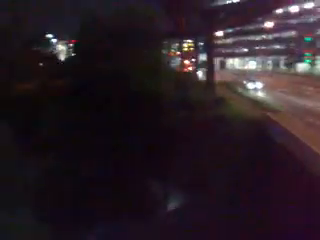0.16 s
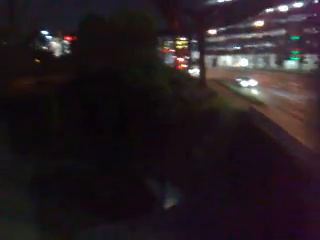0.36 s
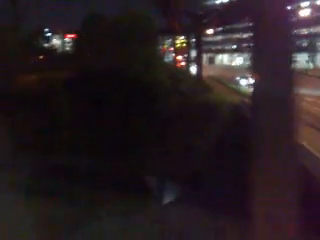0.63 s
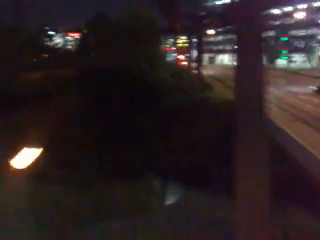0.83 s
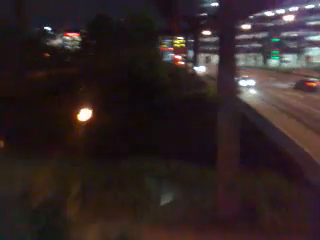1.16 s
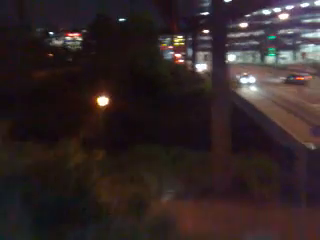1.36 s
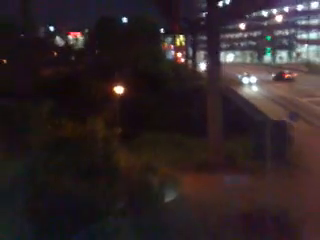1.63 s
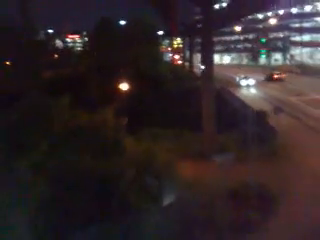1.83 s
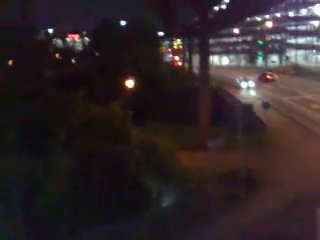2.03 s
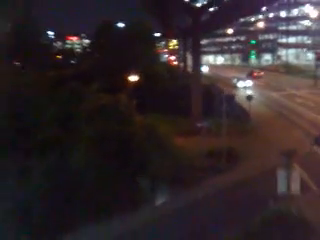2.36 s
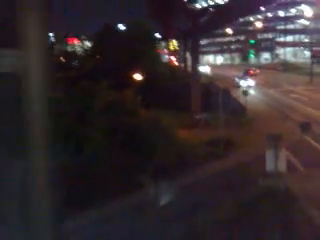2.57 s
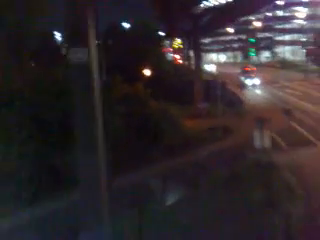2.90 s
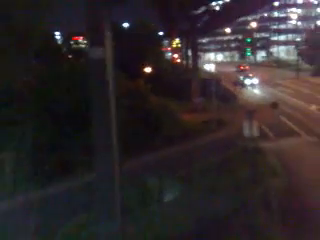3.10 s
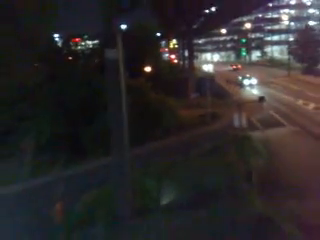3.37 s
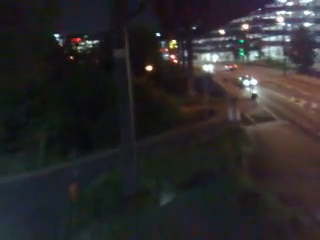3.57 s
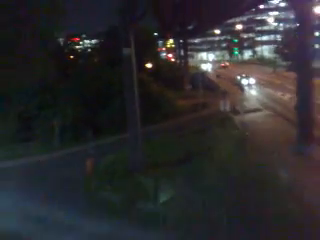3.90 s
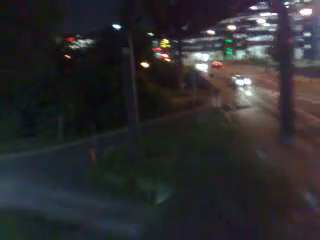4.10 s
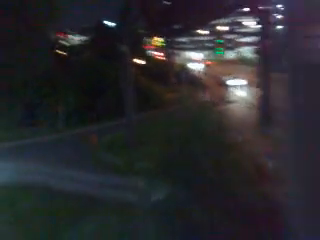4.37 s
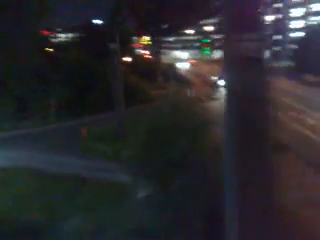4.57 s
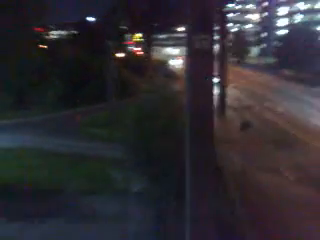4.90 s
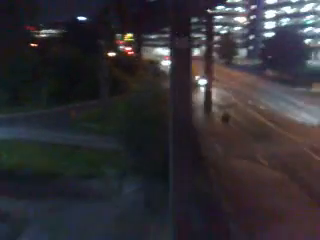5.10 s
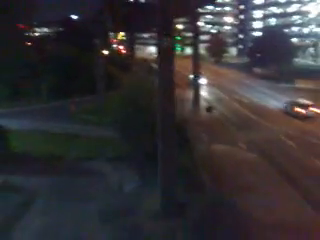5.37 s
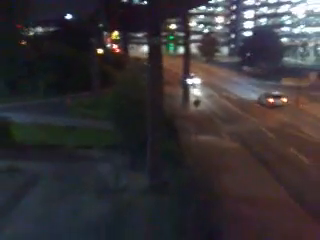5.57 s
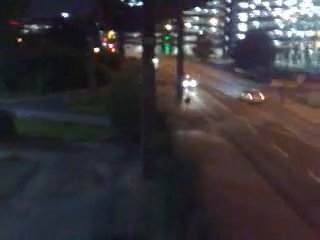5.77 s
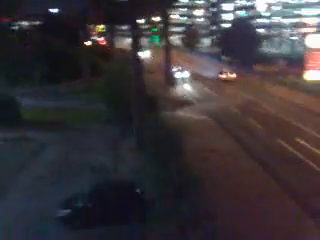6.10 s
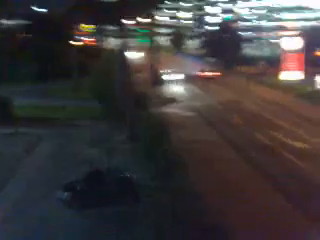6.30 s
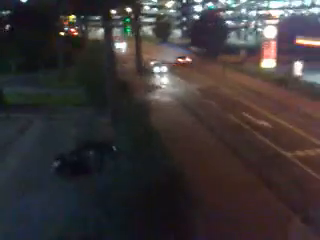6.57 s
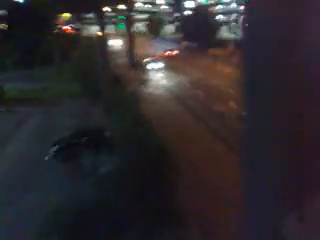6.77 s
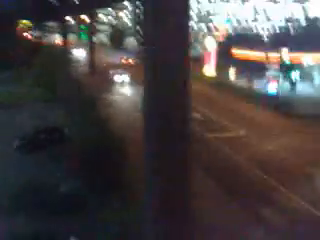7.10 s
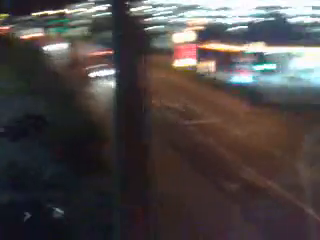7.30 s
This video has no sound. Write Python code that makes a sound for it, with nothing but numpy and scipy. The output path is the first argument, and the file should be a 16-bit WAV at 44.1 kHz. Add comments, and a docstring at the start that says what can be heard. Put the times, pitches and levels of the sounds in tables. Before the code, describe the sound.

A suspended monorail car rumbles and hums along its track, heard from inside, with bumps, brief rattles and a thin electric buzz later on.

```python
"""Suspended monorail cabin at night.

Rubber tyres roll on the beam overhead and shake the frame and panels; bumps knock, fittings rattle.
Two fans beat slowly against each other. The rectified mains hum throughout, and from about 5 s
the coils of the drive electronics add a thin, high buzz."""
import sys
import numpy as np
from scipy import signal
from scipy.fft import rfft, irfft
from scipy.io import wavfile
from scipy.ndimage import uniform_filter1d

SR = 44100
rng = np.random.default_rng(int(sys.argv[2]) if len(sys.argv) > 2 else 0)


def waveform_to_disk(signal):
    """Save audio, clipped to [-1, 1], as 16-bit WAV at the path in sys.argv[1]."""
    frames = np.transpose(np.atleast_2d(signal))
    scaled = np.clip(frames, -1, 1) * 32767
    samples = np.round(scaled).astype(np.int16)
    wavfile.write(sys.argv[1], SR, samples)


N = 328545
TIME = np.arange(N) / SR
MAINS_HZ = 50.05
DRIVE_ON_S = 4.9

# tyre noise on the beam: time_s, roar_db, hiss_db
TYRE_LEVELS = [(0, -41, -45.5), (.6, -40.5, -43.5), (1.35, -41, -47), (2.4, -38.5, -46.5),
               (3.2, -41, -47.5), (3.4, -42, -50), (5.0, -42.5, -50.5), (6.4, -44, -51.5), (7.0, -41, -50),
               (7.45, -46, -50)]
# cabin panel resonances: pitch_hz, width_hz, gain_db
PANEL_MODES = [(136.2, 22.4, -3), (183.2, 38.5, -3.5), (224.7, 12.9, -2), (257, 48, -11.5),
               (320.7, 47, -11.5), (373, 31, -16.5), (430.6, 53, -18.5)]


def undb(db):
    """Decibels to gain."""
    return 10 ** (np.asarray(db) / 20)


def unit(x):
    """Scale to rms 1."""
    return x / np.sqrt(np.mean(x ** 2))


def curves(table):
    """Per-sample curve for each column after time_s."""
    time_s, *columns = np.transpose(table)
    return [np.interp(TIME, time_s, column) for column in columns]


def gate(start_s, end_s, edge_s):
    """Linear rise, hold, linear fall."""
    return np.clip(np.minimum(TIME - start_s, end_s - TIME) / edge_s + .5, 0, 1)


def swell(peak_s, half_s):
    """Gaussian envelope, 1/e at half_s from the peak."""
    return np.exp(-((TIME - peak_s) / half_s) ** 2)


def walk(rate_hz):
    """Smooth random drift, spread near 1."""
    step = int(SR / rate_hz)
    held = np.repeat(rng.standard_normal(N // step + 1), step)
    return 1.22 * uniform_filter1d(uniform_filter1d(held, step), step)[:N]


def colour(spectrum, hz):
    """Gain of a (freq_hz, gain_db) spectrum at hz; steep fall past its ends."""
    freq_hz, gain_db = np.transpose(spectrum)
    inside = undb(np.interp(np.log(hz + 1), np.log(freq_hz), gain_db))
    return inside * np.minimum(hz / freq_hz[0], 1) ** 4 / np.maximum(hz / freq_hz[-1], 1) ** 4


def noise(spectrum):
    """Coloured noise, rms 1."""
    hz = np.arange(N // 2 + 1) * SR / N
    return unit(irfft(rfft(rng.standard_normal(N)) * colour(spectrum, hz), N))


def ring(force, modes):
    """Force through parallel resonances; neighbours swing in opposite senses."""
    out = 0
    for k, (hz, width_hz, db) in enumerate(modes):
        resonator = signal.iirpeak(hz, hz / width_hz, SR)
        out = out + (-1) ** k * undb(db) * signal.lfilter(*resonator, force)
    return out


def whistles():
    """Faint equipment whistles, slightly unsteady in pitch and level."""
    # start_s, end_s, pitch_hz, level_db
    tones = [(0, 4.2, 2308, -65), (0, 1.1, 3020, -63), (2.38, 4.0, 4096, -63.5)]
    out = 0
    for start_s, end_s, hz, db in tones:
        turns = np.cumsum(hz + 4 * walk(120)) / SR
        envelope = undb(db + 1.5 * walk(12)) * gate(start_s, end_s, edge_s=0.056)
        out = out + np.sqrt(2) * np.sin(2 * np.pi * turns) * envelope
    return out


def fans():
    """Two nearly matched fans blow air; their blade tones beat about twice a second."""
    # gap between the blade tones: time_s, beat_hz
    beats = [(0, 2.04), (2.5, 2.0), (4.3, 1.9), (5.0, 1.55), (6, 1.75), (6.6, 2.0), (7.45, 1.85)]
    # air rush: freq_hz, gain_db
    rush_spectrum = [(240, 3), (330, 2), (385, 4), (415, -1), (445, 2), (500, -8), (560, -6), (610, -4),
                     (740, -4), (850, -14), (1100, -12.5), (1350, -17.5)]
    blade_hz, blade_db, rush_db = 359.4, -39, -39
    beat_hz, = curves(beats)
    turns = np.cumsum(blade_hz + 0.36 * walk(2.59)) / SR
    lag = np.cumsum(beat_hz) / SR / 2
    pair = np.sin(2 * np.pi * (turns - lag)) - 0.74 * np.sin(2 * np.pi * (turns + lag))
    blades = unit(pair) * undb(blade_db + 0.76 * walk(7.0))
    return blades + noise(rush_spectrum) * undb(rush_db + .5 * walk(5))


def rectifier():
    """Six-pulse supply ripple at 6 and 12 times the mains; sinks while coasting, returns under load."""
    # time_s, sixth_db, twelfth_db
    ripple_levels = [(0, -37, -40.5), (.8, -35.5, -42.5), (1.15, -40, -43.5), (1.4, -41, -45.5),
                     (2.7, -39.5, -44.5), (3.5, -40, -48.5), (4.2, -43, -53), (4.7, -42.5, -54),
                     (4.8, -36.5, -41), (6.0, -34, -43.5), (7.45, -33, -41.5)]
    out = 0
    for order, db in zip((6, 12), curves(ripple_levels)):
        turns = order * MAINS_HZ * TIME + rng.random()
        out = out + np.sqrt(2) * np.sin(2 * np.pi * turns) * undb(db + 0.5 * walk(9))
    return out


def mains_lines(orders, gains, flicker_db, start_s):
    """Mains harmonics, out of step after crossing the cabin; each flickers and wanders on its own."""
    on = TIME >= start_s
    t = TIME[on]
    flicker = np.tile(undb(flicker_db * walk(18)), 2)
    wander_turns = np.tile(.11 * walk(45), 2)
    lines = 0
    for order, gain in zip(orders, gains):
        waver = flicker[rng.integers(N):][:len(t)]
        turns = MAINS_HZ * order * t + rng.random() + wander_turns[rng.integers(N):][:len(t)]
        lines = lines + gain * waver * np.sin(2 * np.pi * (turns % 1), dtype=np.float32)
    out = np.zeros(N)
    out[on] = unit(lines)
    return out


def drive_gain():
    """The drive switches on, comes up smoothly, then grows slowly."""
    base_db, rise_s, growth_db_per_s = -51, 0.46, 3
    since_s = np.maximum(TIME - DRIVE_ON_S, 0)
    return (1 - np.exp(-(since_s / rise_s) ** 2)) * undb(base_db + growth_db_per_s * since_s)


def coil_buzz():
    """Switching on each mains half-wave makes the coils sizzle."""
    # harmonics the casing favours: pitch_hz, gain_db
    casing_peaks = [(2805, -60.5), (2002, -61), (2703, -61), (4307, -66), (4506, -66), (4807, -65.5),
                    (4904, -66), (5103, -67), (5206, -65), (5308, -70), (5405, -68), (5507, -73),
                    (5604, -68), (5706, -69), (5809, -62.5), (5905, -66.5), (6008, -65.5), (6105, -64.5),
                    (6207, -66.5), (6309, -63.5)]
    # weaker lines and noise: freq_hz, gain_db
    spectrum = [(1500, 16.5), (2000, -3), (2400, 0), (2750, -3), (3100, -0.5), (3400, -6), (3750, -3.5),
                (4000, -2), (4600, -1.5), (5200, -14), (5550, -2.5), (5830, -6), (6200, -7.5), (6550, 3),
                (6900, -3.5), (7300, -8)]
    favoured = {round(hz / MAINS_HZ): undb(db) for hz, db in casing_peaks}
    orders = np.arange(36, 147)
    # weaker lines between the 100 Hz harmonics roughen the buzz
    gains = [favoured.get(k, colour(spectrum, MAINS_HZ * k) * undb(-67 - 6 * (k % 2))) for k in orders]
    lines = mains_lines(orders, gains, flicker_db=3, start_s=DRIVE_ON_S)
    sizzle = (lines + undb(-5) * noise(spectrum)) * undb(1.3 * walk(110))
    return sizzle * drive_gain()


def coil_whine():
    """The casing rings with the harmonics near its resonance; the whine follows the drive and surges."""
    # start_s, length_s, level_db
    surges = [(.68, 0.55, -66.5), (6.353, 0.26, -45), (7.02, 0.088, -46), (7.235, 0.078, -46),
              (7.414, .1, -41.5)]
    # casing resonance: freq_hz, gain_db
    spectrum = [(6300, -1), (6450, -17), (6600, 1.5), (6720, -6), (6850, -17), (7100, -42.5)]
    surge_gain = sum(undb(db) * gate(s, s + length_s, edge_s=0.038) for s, length_s, db in surges)
    orders = np.arange(126, 138)
    gains = colour(spectrum, MAINS_HZ * orders) * undb(-8 * (orders % 2))
    lines = mains_lines(orders, gains, flicker_db=3, start_s=0)
    hiss = unit(ring(noise(spectrum), [(6620, 250, 0)]))
    return unit(lines + undb(-3) * hiss) * np.hypot(drive_gain() * undb(-7.5), surge_gain)


def collectors():
    """Shoes slide on the power rails; their grainy hiss swells with the tyre hiss."""
    # sliding noise: freq_hz, gain_db
    spectrum = [(3400, -10), (3750, 1), (4100, 5.5), (4600, 1.5), (5000, -3), (5600, -8), (6050, -7),
                (6700, -11.5), (7100, -28)]
    mean_db, follow_db_per_db = -60.5, 0.24
    _, hiss_db = curves(TYRE_LEVELS)
    level_db = mean_db + follow_db_per_db * (hiss_db - hiss_db.mean())
    return noise(spectrum) * undb(level_db + 1.7 * walk(60))


def squeaks():
    """Suspension joints rub briefly at an unsteady pitch."""
    # peak_s, half_s, pitch_hz, level_db
    rubs = [(0.577, 0.014, 4000, -58), (0.68, .025, 4130, -59), (1.098, 0.033, 4100, -56.5),
            (2.91, .022, 4070, -55.5), (3.162, 0.03, 4020, -57), (4.62, .025, 4150, -62),
            (4.82, .025, 4150, -60), (5.009, 0.022, 4200, -56), (5.208, 0.023, 4290, -55.5),
            (6.024, 0.035, 4200, -58)]
    warped_s = np.cumsum(1 + 0.022 * walk(600)) / SR
    tones = sum(undb(db) * swell(s, half_s) * np.sin(2 * np.pi * hz * warped_s)
                for s, half_s, hz, db in rubs)
    return np.sqrt(2) * tones * undb(3.5 * walk(200))


def rasps():
    """Wheel flanges stick and slip on the beam in bends, exciting a broad resonance."""
    # start_s, end_s, pitch_hz, width_hz, level_db
    contacts = [(.1, 1.2, 4130, 700, -61.5), (2.3, 3.25, 4090, 650, -60.5), (3.25, 4.0, 4120, 600, -66),
                (6.42, 7.02, 2880, 220, -53), (6.67, 6.725, 2880, 450, -43.5), (7.22, 7.5, 2880, 220, -55)]
    out = 0
    for start_s, end_s, hz, width_hz, db in contacts:
        slips = rng.standard_normal(N) * undb(1.5 * walk(90))
        mode = [(hz, width_hz, 0)]
        rasp = unit(ring(ring(slips, mode), mode))
        out = out + rasp * undb(db) * gate(start_s, end_s, edge_s=0.045)
    return out


def rattles():
    """Loose fittings chatter in dense, uneven taps that die away."""
    # start_s, decay_s, level_db
    bursts = [(.415, .035, -40), (.44, .035, -41), (.6, .04, -44), (.945, .05, -43), (1.76, .04, -44.5),
              (4.39, .06, -45)]
    # pitch_hz, width_hz, gain_db
    fitting_modes = [(975, 52, 5), (1290, 90, 1), (2280, 230, -19), (2520, 240, 0.5), (2880, 180, -1.5)]
    taps_per_s = 300
    taps = (rng.random(N) < taps_per_s / SR) * rng.standard_normal(N)
    envelope = sum(undb(db) * (TIME >= s) * np.exp(-np.abs(TIME - s) / decay_s)
                   for s, decay_s, db in bursts)
    return unit(ring(taps, fitting_modes)) * envelope


def clacks():
    """Loose fittings strike once and ring briefly."""
    # start_s, level_db
    strikes = [(.250, -40), (.306, -34), (.428, -35), (.459, -32.5), (.529, -35), (.573, -30.5),
               (.599, -35), (.967, -38), (5.462, -37), (5.6, -31.5), (6.988, -40)]
    # one clack: freq_hz, gain_db
    spectrum = [(600, 2.5), (1000, 9), (1400, -5), (1900, -3), (2500, -4), (3100, -14), (4200, -17),
                (5200, -37)]
    length_s, decay_s = .1, .01
    envelope = 0
    for s, db in strikes:
        decay = np.exp(-np.minimum(np.abs(TIME - s), length_s) / decay_s)
        envelope = envelope + undb(db) * gate(s, s + length_s, edge_s=.003) * decay
    return noise(spectrum) * envelope


def cabin_drone():
    """The cabin's lowest air resonance drones restlessly, swells once and booms."""
    # peak_s, level_db
    booms = [(1.572, -18), (1.85, -29), (3.11, -20.5), (3.245, -15.5), (3.44, -27), (3.57, -27),
             (3.68, -28), (3.829, -20.5), (3.99, -22.5)]
    pitch_hz, floor_db, attack_s, decay_s = 179.7, -42, 0.014, 0.044
    envelope = undb(floor_db) + undb(-36.5) * gate(start_s=3.5, end_s=4, edge_s=0.1)
    for s, db in booms:
        boom = np.exp(-np.maximum((s - TIME) / attack_s, (TIME - s) / decay_s))
        envelope = np.hypot(envelope, undb(db) * boom)
    turns = np.cumsum(pitch_hz + 6 * walk(30)) / SR
    return np.sqrt(2) * np.sin(2 * np.pi * turns) * envelope * undb(2 * walk(28.12))


def tyres():
    """Rolling roar and hiss flutter with the surface and rise on coarse patches."""
    # start_s, length_s, roar_db, hiss_db
    coarse_patches = [(0.216, 0.091, -42, -55), (0.413, 0.073, -37, -43), (0.536, 0.056, -39, -57),
                      (0.936, 0.093, -46.5, -47), (1.697, 0.16, -54, -49.5), (2.24, 0.76, -38.5, -58),
                      (2.4, .16, -54, -48), (2.793, 0.09, -37, -54), (3.096, 0.21, -39.5, -53),
                      (3.672, 0.16, -52, -51.5), (4.367, .11, -41, -46.5), (5.45, .2, -48, -62),
                      (6.044, 0.14, -45, -57), (6.664, 0.055, -39, -44), (7.045, 0.14, -44, -45)]
    # freq_hz, gain_db
    roar_spectrum = [(480, -0.5), (640, 1.5), (830, -2.5), (1020, 0), (1250, -3), (1480, -5), (1700, -18.5)]
    # freq_hz, gain_db
    hiss_spectrum = [(940, -34.5), (1600, 0.5), (1660, -3), (1820, -4.5), (2060, 0), (2370, 1), (3100, -2),
                     (3500, -9.5), (4550, -44), (7700, -120)]
    roar_power, hiss_power = undb(curves(TYRE_LEVELS)) ** 2
    for start_s, length_s, roar_db, hiss_db in coarse_patches:
        on_patch = gate(start_s, start_s + length_s, edge_s=0.033)
        roar_power += on_patch * undb(roar_db) ** 2
        hiss_power += on_patch * undb(hiss_db) ** 2
    flutter = walk(35)
    roar = noise(roar_spectrum) * np.sqrt(roar_power) * undb(0.8 * flutter)
    hiss = noise(hiss_spectrum) * np.sqrt(hiss_power) * undb(0.64 * flutter)
    return roar + hiss


def scuffs():
    """Guide wheels rub in swells of high hiss."""
    # peak_s, half_s, level_db
    rubs = [(0.248, 0.044, -57), (1.463, 0.025, -57.5), (3.105, 1, -67), (3.748, 0.066, -53.5),
            (5.75, .07, -53.5), (6.698, 0.038, -46), (6.982, 0.037, -53), (7.12, 0.099, -49)]
    # rubbing noise: freq_hz, gain_db
    spectrum = [(1500, -18), (2900, -3), (3500, 1.5), (4300, 7), (6000, 1), (7000, -14.5)]
    return noise(spectrum) * sum(undb(db) * swell(s, half_s) for s, half_s, db in rubs)


def shudders():
    """Light wall panels shudder briefly, above the pitch of the rumble."""
    # peak_s, half_s, pitch_hz, level_db
    bursts = [(1.598, 0.029, 285, -25), (1.837, 0.031, 355, -26), (3.277, 0.047, 310, -28.5),
              (4.01, 0.027, 300, -23.5), (4.417, 0.055, 365, -30.5)]
    jitter_hz = 20
    out = 0
    for s, half_s, hz, db in bursts:
        turns = np.cumsum(hz + jitter_hz * walk(150)) / SR
        out = out + undb(db) * swell(s, half_s) * np.sin(2 * np.pi * turns)
    return out


def bumps():
    """Each bump in the beam is a short push that rings the panels."""
    # start_s, peak_db
    impacts = [(0.272, -17.5), (1.55, -16.5), (1.821, -15.5), (1.899, -16), (3.099, -18), (3.24, -17.5),
               (3.489, -26), (3.821, -12.5), (5.46, -18)]
    contact_s = 0.0015
    push = np.exp(-(TIME / contact_s - 2) ** 2)
    knock = ring(push[:SR // 2], PANEL_MODES)
    hits = np.zeros(N)
    for s, db in impacts:
        hits[int(s * SR)] += undb(db)
    return signal.fftconvolve(hits, knock / np.abs(knock).max())[:N]


def thuds():
    """The car bounces on its damped suspension, a few deep swings each time."""
    # peak_s, pitch_hz, level_db
    bounces = [(1.03, 26.85, -20.5), (1.33, 87.1, -20), (1.831, 111.9, -17), (1.91, 80.6, -18.5),
               (2.49, 54.9, -20), (2.87, 74.2, -19), (3.065, 54.6, -14.5), (3.25, 60, -19),
               (3.497, 61.6, -16), (4.43, 61.8, -21), (5.0, 58, -21), (5.49, 85.4, -17.5), (5.552, 48, -17),
               (5.752, 66, -16.5), (6.97, 45, -22)]
    half_cycles = 1.9
    return sum(undb(db) * swell(s, half_cycles / hz) * np.sin(2 * np.pi * (hz * TIME + rng.random()))
               for s, hz, db in bounces)


def shaken(modes, level_db, cutoff_hz):
    """Beam roughness, softened by the tyres, shakes a structure."""
    rubber = signal.butter(3, cutoff_hz, fs=SR, output="sos")
    force = signal.sosfilt(rubber, rng.standard_normal(N))
    rumble = unit(ring(force, modes))
    rumble /= np.sqrt(uniform_filter1d(rumble ** 2, SR // 6))  # evenly rough beam: no long swells
    return rumble * undb(level_db)


def car_body():
    """The hanging frame rumbles and thuds; the panels rumble, knock and shudder."""
    # ride roughness: time_s, frame_db, panel_db
    ride_levels = [(0, -24.5, -27.5), (.5, -24.5, -28), (.9, -31.5, -31.5), (1.0, -24.5, -29),
                   (1.7, -22, -27), (2.6, -25.5, -27.5), (3.1, -23, -29.5), (3.8, -27.5, -29),
                   (4.45, -24, -26.5), (5.25, -25, -34.5), (5.48, -23.5, -26.5), (5.9, -24.5, -32),
                   (6.35, -22.5, -30), (6.65, -27.5, -29.5), (7.45, -28, -30)]
    # pitch_hz, width_hz, gain_db
    frame_modes = [(24, 11, -2.5), (44, 9.6, -2), (56, 14, 1), (83.3, 6.3, -3), (93.3, 7.9, -1.5),
                   (124, 25, -12)]
    frame_db, panel_db = curves(ride_levels)
    frame = shaken(frame_modes, frame_db, cutoff_hz=182) + thuds()
    panels = shaken(PANEL_MODES, panel_db, cutoff_hz=587) + bumps() + shudders()
    return frame + panels


def scene():
    """Mono mix at the cabin window."""
    running = car_body() + cabin_drone() + tyres() + scuffs() + collectors() + squeaks() + rasps()
    fittings = rattles() + clacks()
    equipment = rectifier() + whistles() + fans() + coil_buzz() + coil_whine()
    return (running + fittings + equipment)[None]


def record(dry):
    """Steep low-pass: no top octave."""
    cutoff_hz = 7280
    return signal.sosfilt(signal.ellip(14, .2, 90, cutoff_hz, fs=SR, output="sos"), dry)


dry = scene()
out = record(dry)
waveform_to_disk(out)
```